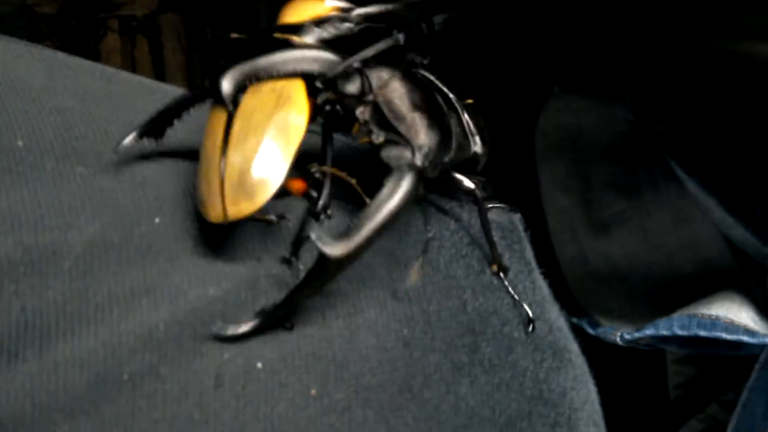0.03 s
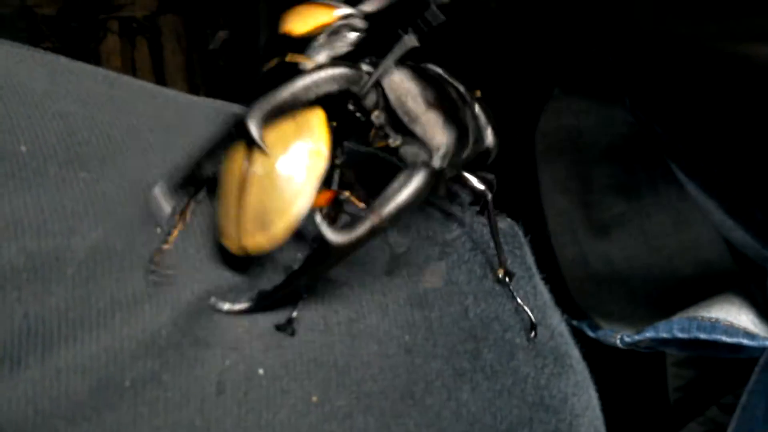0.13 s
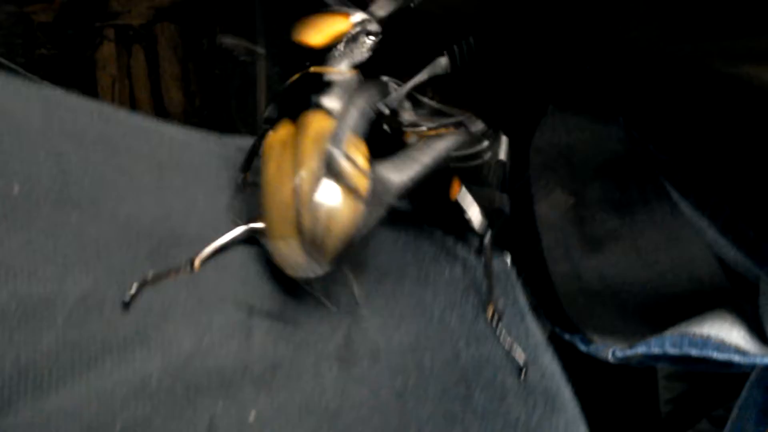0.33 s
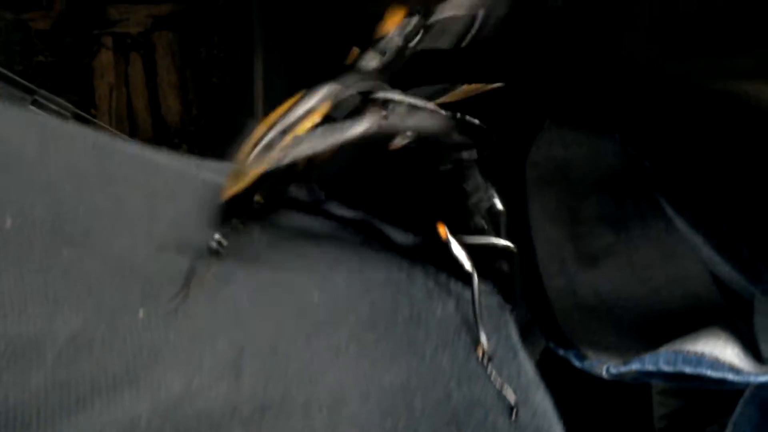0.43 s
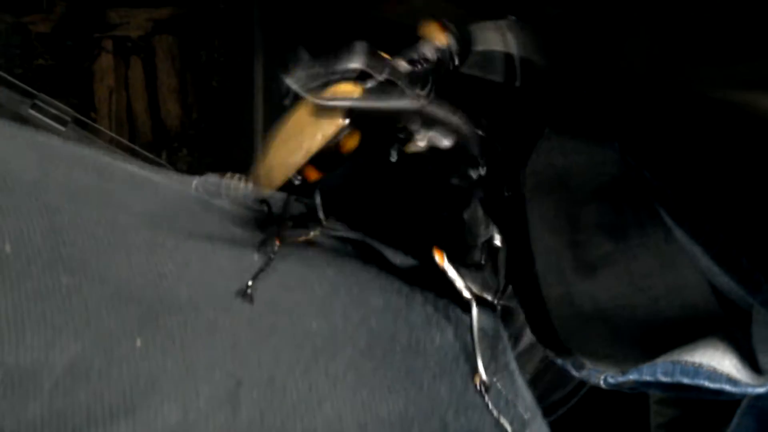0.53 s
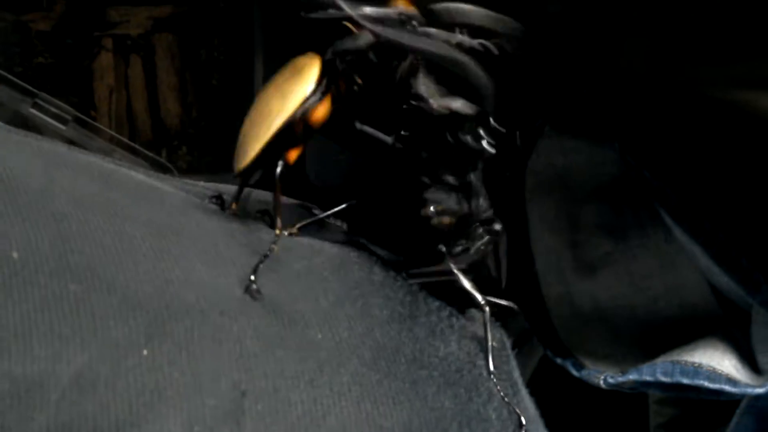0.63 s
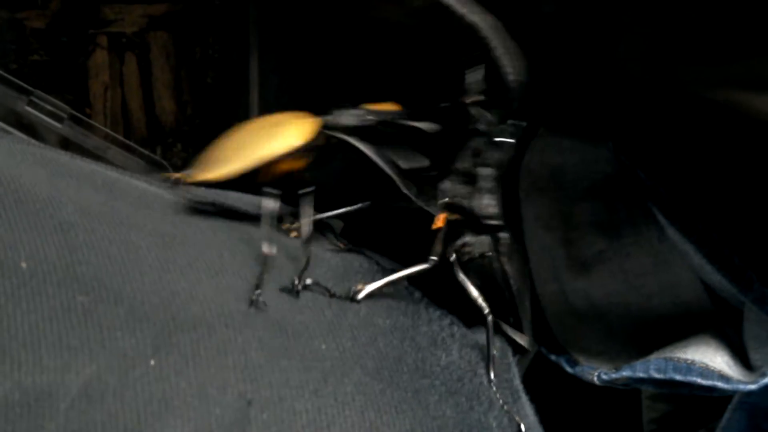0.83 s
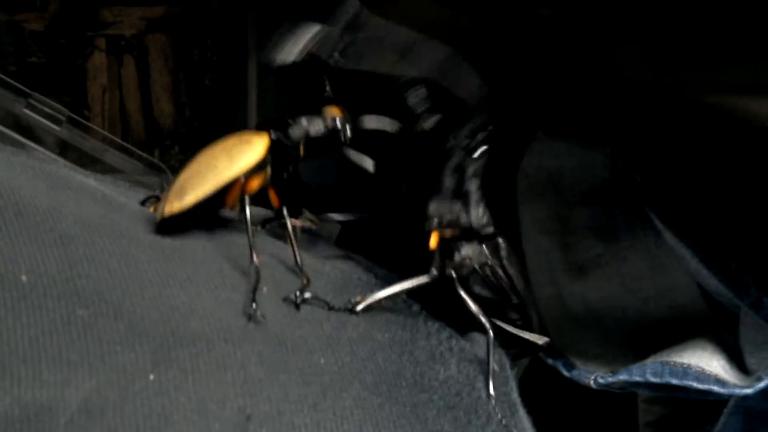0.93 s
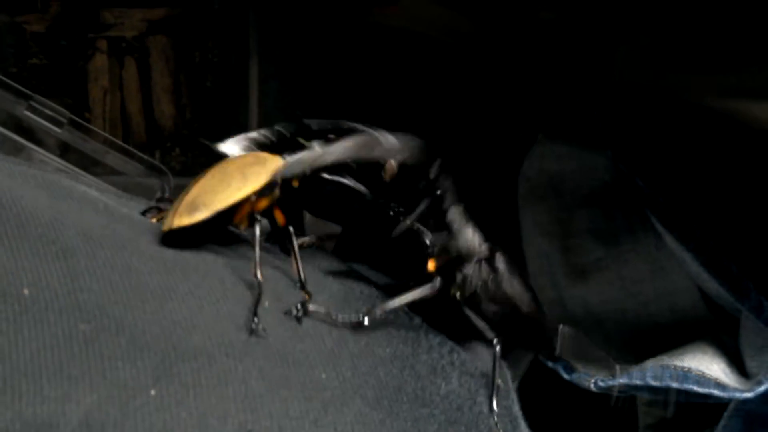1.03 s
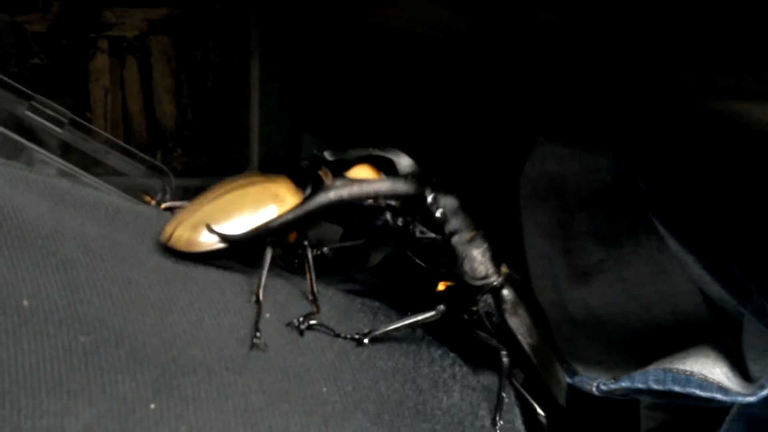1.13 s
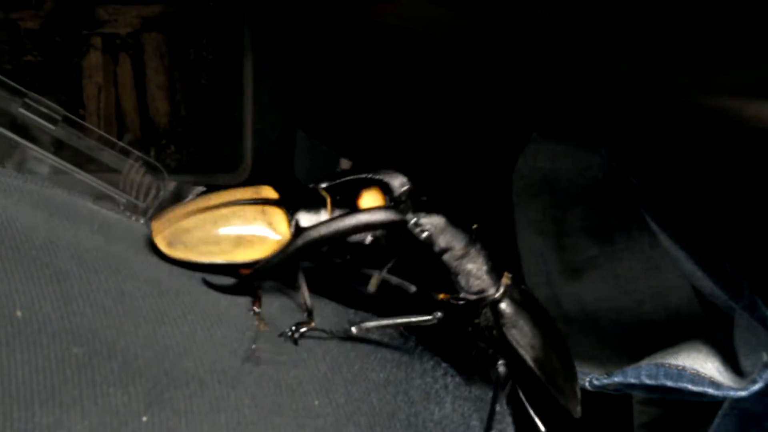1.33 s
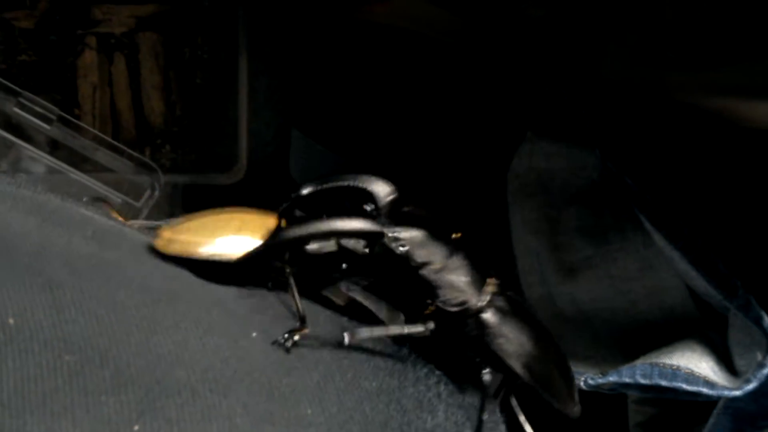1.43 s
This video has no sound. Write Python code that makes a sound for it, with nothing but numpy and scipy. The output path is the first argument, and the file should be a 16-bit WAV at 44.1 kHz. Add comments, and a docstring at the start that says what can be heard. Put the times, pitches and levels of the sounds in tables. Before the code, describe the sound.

Beetles grappling up close: horns crack, legs tick and claws scratch over padded fabric.

```python
"""Beetles wrestling on padding

Two large beetles wrestle on cloth-covered padding, close to the microphone in a quiet room.
Their locked horns slip in a quick run of cracks and the padding takes a soft double thump.
Then hooked feet tick, scrape and snag over the weave while legs click against hollow shells."""
import sys
import numpy as np
from scipy import signal
from scipy.fft import rfft, irfft, next_fast_len
from scipy.io import wavfile
from scipy.ndimage import uniform_filter1d

SR = 44100
rng = np.random.default_rng(int(sys.argv[2]) if len(sys.argv) > 2 else 0)


def output_pcm(signal):
    """Save a mono or channel-first signal as 16-bit PCM at the path in sys.argv[1].

    Samples are clipped to [-1, 1] before scaling.
    """
    pcm = np.clip(np.atleast_2d(signal).T, -1, 1) * 32767
    wavfile.write(sys.argv[1], SR, np.round(pcm).astype(np.int16))


N = 66150
T = np.arange(N) / SR
FFT_SIZE = next_fast_len(N + N // 5)
FREQ_HZ = np.arange(FFT_SIZE // 2 + 1) * SR / FFT_SIZE


def gain(db):
    """Decibels to gain."""
    return 10 ** (np.asarray(db) / 20)


def unit_rms(x):
    """Scale to rms 1."""
    return x / np.sqrt(np.mean(x ** 2))


def eq_curve(points):
    """Decibels at every frequency, joining the points on a log axis."""
    hz, db = np.array(points).T
    return np.interp(np.log(FREQ_HZ + 1), np.log(hz), db)


def filtered(x, response):
    """Filter by a frequency response."""
    return irfft(rfft(x, FFT_SIZE) * response, FFT_SIZE)[..., :N]


def eq_response(points):
    """Minimum-phase EQ, so nothing rings ahead of an attack."""
    cepstrum = irfft(np.log(gain(eq_curve(points))), FFT_SIZE)
    cepstrum[1:FFT_SIZE // 2] *= 2
    cepstrum[FFT_SIZE // 2 + 1:] = 0
    return np.exp(rfft(cepstrum))


def noise_bed(points):
    """Steady noise shaped by an EQ, at rms 1."""
    return unit_rms(filtered(rng.standard_normal(N), eq_response(points)))


def flutter(rate_hz):
    """A smooth random wander at rms 1."""
    hold = int(SR / rate_hz)
    steps = np.repeat(rng.standard_normal(N // hold + 1), hold)
    return unit_rms(uniform_filter1d(steps, hold)[:N])


def contact(force, eq, body_hz=3600, snap_hz=7000):
    """Cross over three force tracks as hollow body, middle and top snap, then EQ the sum."""
    body, below_snap = (1 / (1 + (FREQ_HZ / hz) ** 8) for hz in (body_hz, snap_hz))
    bands = rfft(force, FFT_SIZE) * np.array([body, below_snap - body, 1 - below_snap])
    return irfft(bands.sum(axis=0) * eq_response(eq), FFT_SIZE)[:N]


def clicks(hits, eq):
    """One sudden release of force per hit; body_db and snap_db are relative to its middle band."""
    force = np.zeros((3, N))
    for start_s, level_db, body_db, snap_db in hits:
        force[:, int(start_s * SR)] += gain(level_db + np.array([body_db, 0, snap_db]))
    return contact(force, eq)


# Tone of the still air and microphone hiss, mid and side: freq_hz, gain_db
AIR_MID_EQ = [(20, -2), (60, 3), (120, 1.5), (200, -3.5), (400, -7.5), (800, -11.5), (1800, -10.5),
              (3200, -17.5), (6000, -29), (8000, -24), (11000, -31), (15500, -29)]
AIR_SIDE_EQ = [(20, -17), (120, -15.5), (300, -21), (800, -22), (2000, -19.5), (6000, -27.5),
               (10000, -33.5), (15500, -32.5)]
def room_tone(mid_db=-63, side_db=-72.5):
    """A quiet bed of air, centred in the bass and wide in the hiss."""
    mid = gain(mid_db) * noise_bed(AIR_MID_EQ)
    side = gain(side_db) * noise_bed(AIR_SIDE_EQ)
    return np.array([mid + side, mid - side])


# Level ride of the padding's rumble: time_s, level_db
SWAY_RIDE = [(0, -57.5), (.3, -61), (.6, -70.5), (.72, -60), (.79, -65), (.87, -62), (.97, -62),
             (1.03, -62), (1.2, -60.5), (1.3, -65.5), (1.5, -62)]
# Deep tone of that rumble: freq_hz, gain_db
SWAY_EQ = [(12, -18.5), (28, -6.5), (52, -3), (80, -14), (120, -21), (250, -51.5)]
def padding_sway():
    """The padding rumbles low as the beetles shift their weight."""
    time_s, level_db = np.array(SWAY_RIDE).T
    return noise_bed(SWAY_EQ) * gain(np.interp(T, time_s, level_db))


def claw_drag(samples, rasp_hz, plucks_per_s=2400, spread_db=3, rasp_width_hz=1320, rasp_db=1):
    """A claw plucks thread after thread; the dragging leg rings at its own pitch."""
    chance, size, polarity = rng.random((samples, 3)).T
    strength = gain(-spread_db * np.log(size + np.exp(-3)))  # many soft plucks, a few strong ones
    plucks = (chance < plucks_per_s / SR) * np.sign(polarity - .5) * strength
    plucks = unit_rms(plucks + 1e-12)
    leg_resonance = signal.iirpeak(rasp_hz, rasp_hz / rasp_width_hz, SR)
    return plucks + gain(rasp_db) * signal.lfilter(*leg_resonance, plucks)


# Strokes over the cloth: start_s, envelope_s, level_db, body_db, snap_db, rasp_hz
FOOT_STROKES = [(0.042, 0.038, -63.5, -2.5, -1, 6000), (0.145, 0.2, -65.5, 4, -3, 6100),
                (0.204, 0.062, -61, 9, -12, 5840), (0.32, 0.0047, -78, 27.5, -2, 5500),
                (0.345, 0.055, -64, 6.5, -2, 5660), (.398, 0.054, -63, -4, -1, 5650),
                (0.566, 0.018, -56, -12, -6, 5800), (0.611, .012, -62, -1, -2, 5600),
                (0.665, 0.043, -58.5, -2.5, -21, 4730), (0.728, 0.055, -61, 2.5, 2, 4700),
                (0.8, 0.03, -67, -19, 2, 5270), (0.853, 0.016, -68, -22, 9, 6070),
                (0.902, 0.046, -58.5, -8, -4, 5960), (0.954, 0.069, -63.5, 2.5, -3, 5900),
                (1.023, 0.038, -57, -3.5, -4, 5100), (1.072, 0.015, -54.5, -2.5, -7, 5750),
                (1.093, 0.041, -56, -2, -7.5, 5700), (1.13, 0.033, -57.5, 0, 3.5, 5850),
                (1.197, .054, -59.5, 3, 0.5, 6000), (1.211, 0.02, -51.5, 0.5, -4.5, 5470),
                (1.328, 0.011, -65.5, -11, 2, 5600), (1.395, 0.049, -60, 4.5, -2, 6200),
                (1.439, 0.023, -54.5, 3, -0.5, 5940), (1.455, 0.028, -66.5, 0, 2, 5940)]
# Dry, scratchy tone of the weave: freq_hz, gain_db
WEAVE_EQ = [(300, -18), (800, -12), (1400, -6.5), (1800, 2), (2650, -4.5), (3250, -12.5), (4100, -7),
            (4900, -7), (5900, -4.5), (6700, -9.5), (7600, -18.5), (8900, -13.5), (12000, -27.5),
            (16000, -30)]
def foot_scrapes(trim_db=-2, rustle_db=-72.5, flutter_db=2.5):
    """Feet drag over the weave in strokes of up to 0.1 s, above a faint, fluttering rustle."""
    attack, release = 0.17, 0.35  # shares of the envelope
    rustle = gain(rustle_db + flutter_db * flutter(rate_hz=35.18)) * claw_drag(N, rasp_hz=5800)
    force = np.tile(rustle, (3, 1))
    for start_s, envelope_s, level_db, body_db, snap_db, rasp_hz in FOOT_STROKES:
        start = int(start_s * SR)
        drag = claw_drag(SR // 10, rasp_hz)[:N - start]
        progress = T[:len(drag)] / envelope_s
        pressure = np.clip(np.minimum(progress / attack, (1 - progress) / release), 0, 1)
        band_gains = gain(trim_db + level_db + np.array([[body_db], [0], [snap_db]]))
        force[:, start:start + len(drag)] += band_gains * pressure * drag
    eq_rms = np.sqrt(np.mean(gain(eq_curve(WEAVE_EQ)) ** 2))
    return contact(force, WEAVE_EQ) / eq_rms


# Resonances of the hollow shells: pitch_hz, t60_s, level_db
SHELL_MODES = [(1266, 0.11, -61), (1730, 0.051, -57), (1774, 0.049, -59), (1935, 0.027, -53),
               (2300, .03, -72), (2740, 0.041, -47), (5130, 0.047, -54), (5845, 0.06, -53),
               (6030, 0.017, -51)]
def shell_ring(contacts):
    """Every contact sets the hollow shells ringing briefly."""
    t = T[:SR // 10]
    ring = sum(gain(level_db) * np.exp(-np.log(1000) * t / t60_s) * np.cos(2 * np.pi * pitch_hz * t)
               for pitch_hz, t60_s, level_db in SHELL_MODES)
    return filtered(contacts, rfft(ring, FFT_SIZE))


# Taps of leg on shell: start_s, level_db, body_db, snap_db
LEG_HITS = [(.0425, -46, -4, -4), (.3, -43.5, -7, -4), (.4545, -56, 19, -4), (.546, -41, -11, 0),
            (.6097, -40, -12, -7), (.6166, -42, -11, -8), (.6335, -46, 1, -4), (.6816, -41, 3.5, -3),
            (.7224, -43, 8, -9), (.7262, -34.5, 1, -8), (.8051, -38, -3, -6), (.8225, -44, -2, -4),
            (.847, -42, -10, 3), (.8685, -37, -31, 0), (1.0425, -35, -15, -7), (1.0724, -37, -7, -5),
            (1.0797, -43, -14, -5), (1.1307, -40, 8, -2), (1.369, -39.5, -5, -1), (1.389, -51, -3, -3),
            (1.3902, -28.5, 3.5, 3), (1.4215, -36.5, -12, 11), (1.4275, -49, -12, 1),
            (1.4292, -32.5, -7, -2)]
# Hard, bright tone of a tap: freq_hz, gain_db
LEG_EQ = [(300, -15), (1350, -25), (1850, -2), (2300, 0.5), (2800, 2.5), (3500, -11), (4400, -6), (5200, 1),
          (5800, 7.5), (6700, -2.5), (7500, -12), (8800, -11), (12000, -21.5), (16000, -24)]
def leg_ticks(trim_db=8.5):
    """Legs knock against shell in scattered, hard ticks."""
    return gain(trim_db) * clicks(LEG_HITS, LEG_EQ)


# Horn slipping on shell: start_s, level_db, body_db, snap_db
HORN_SLIPS = [(0.1678, -39.5, 7, -1), (.1862, -48, 7, 0), (.19, -28, -6, -3), (0.207, -40, -2, -3),
              (0.2088, -36, 4, -3), (0.2127, -26, 2.5, -4), (0.215, -48, 0, -4), (0.2167, -19.5, 0, -6),
              (0.2261, -27, 2.5, -1), (0.2268, -32.5, -1, -5), (0.2289, -21.5, -3, -5),
              (.2305, -17, 5.5, 4), (0.233, -52, -9, -3), (.2353, -37, 5, -5), (0.2392, -45, 2, 0),
              (0.2505, -44, -2, -5)]
# Hollow, brittle tone of horn: freq_hz, gain_db
HORN_EQ = [(300, -38), (700, -14.5), (1050, -3.5), (1450, 2), (1750, 6), (2150, 1), (2750, -3),
           (3400, -3.5), (4400, -12.5), (5150, 4), (6200, 3.5), (7200, -5), (8300, -19.5), (10500, -31),
           (12000, -41), (13700, -25), (15000, -38)]
def horn_cracks(trim_db=8):
    """The locked horns stick and slip in a quick run of cracks."""
    return gain(trim_db) * clicks(HORN_SLIPS, HORN_EQ)


# Soft blows and rocking on the padding: start_s, level_db, length_s, pitch_hz
PADDING_BLOWS = [(0.336, -25.5, 0.057, 47.8), (0.385, -32, 0.059, 45), (0.438, -47.5, 0.071, 31.8),
                 (.8, -52, 0.25, 27.35)]
def padding_thumps(cover_hz=124.6, cover_lag_s=0.00676, cover_decay_s=0.0037, cover_db=-2.5):
    """The padding gives and springs back under each blow, and its cover snaps taut."""
    thumps = np.zeros(N)
    for start_s, level_db, length_s, pitch_hz in PADDING_BLOWS:
        age_s = np.clip(T - start_s, 0, length_s)
        bounce = np.sin(np.pi * age_s / length_s) ** 2 * np.sin(2 * np.pi * pitch_hz * age_s)
        taut_s = np.maximum(T - start_s - cover_lag_s, 0)
        cover_envelope = taut_s / cover_decay_s * np.exp(-taut_s / cover_decay_s)
        cover = cover_envelope * np.sin(2 * np.pi * cover_hz * taut_s)
        thumps -= gain(level_db) * (bounce + gain(cover_db) * cover)
    return thumps


# Claws pulling free of the cloth: start_s, level_db, body_db, snap_db
CLAW_RELEASES = [(.6632, -37, -11, -8), (.6964, -50, 0, -5), (.7801, -45, 2, -4), (.9927, -29, -1, -1),
                 (1.4083, -43, 2, -3), (1.4569, -38, 1, 4)]
# Thin, sharp tone of a plucked thread: freq_hz, gain_db
THREAD_EQ = [(300, -26), (1350, -12), (1800, -5), (2700, 8), (3600, 3.5), (4500, 5), (5400, 5), (6600, -7),
             (7500, -15), (8800, -8), (12000, -25), (16000, -27)]
def claw_snags(trim_db=8.5):
    """A hooked claw snaps free of a thread with a click."""
    return gain(trim_db) * clicks(CLAW_RELEASES, THREAD_EQ)


def reflections(t60_s, level_db, build_s=0.0012):
    """A diffuse reverb tail that builds up briefly and dies away."""
    t = T[:SR // 5]
    build = 1 - np.exp(-(t / build_s) ** 2)
    tail = rng.standard_normal(len(t)) * np.exp(-np.log(1000) * t / t60_s) * build
    return gain(level_db) * tail / np.sqrt(np.sum(tail ** 2))


# Stereo lean at the microphone: freq_hz, left_minus_right_db
STEREO_LEAN = [(100, 1.3), (1300, 0), (2600, .5), (4400, -4), (6300, -5), (8000, 2.5), (10000, 9.5),
               (14000, 18)]
def scene():
    """The beetles in a short room reverb and the dry padding, panned by frequency over room tone."""
    contacts = foot_scrapes() + leg_ticks() + horn_cracks() + claw_snags()
    beetles = contacts + shell_ring(contacts)
    room_tails = np.array([reflections(t60_s=0.2, level_db=-16) for _ in range(2)])
    close_tail = reflections(t60_s=0.011, level_db=-12)
    reverb = filtered(beetles, rfft(close_tail + room_tails, FFT_SIZE))
    tussle = beetles + reverb + padding_sway() + padding_thumps()
    pan = gain(np.array([[.5], [-.5]]) * eq_curve(STEREO_LEAN))
    return filtered(tussle, pan) + room_tone()


def record(dry):
    """A steep low-pass takes off the very top."""
    cutoff_hz = 16000
    return signal.sosfilt(signal.ellip(10, .1, 70, cutoff_hz, fs=SR, output="sos"), dry)


dry = scene()
out = record(dry)
output_pcm(out)
```